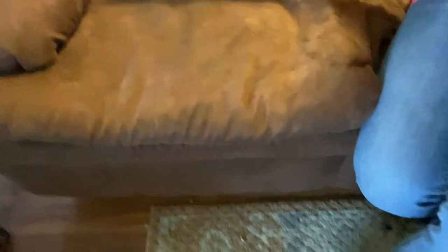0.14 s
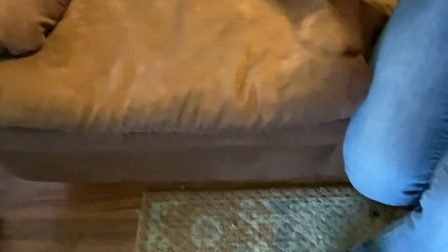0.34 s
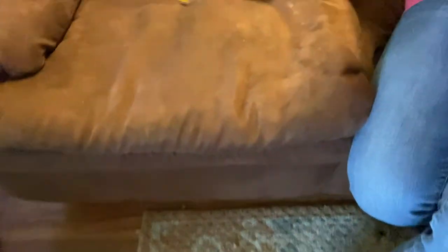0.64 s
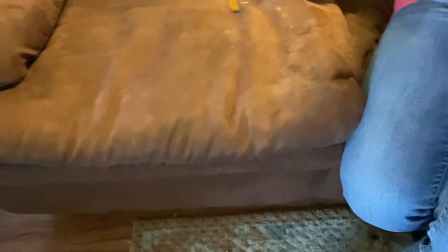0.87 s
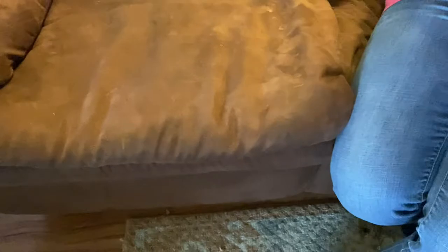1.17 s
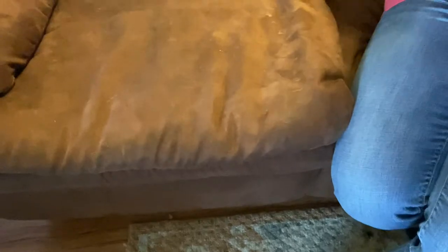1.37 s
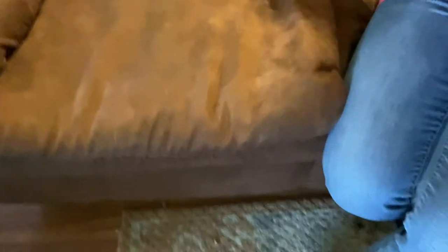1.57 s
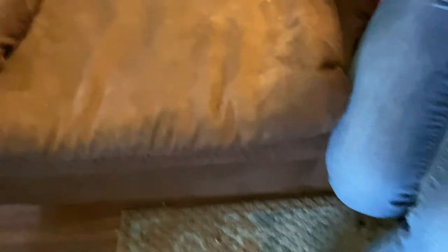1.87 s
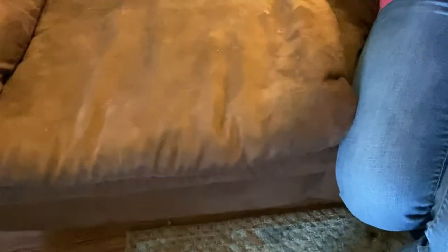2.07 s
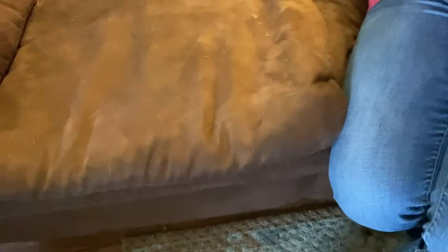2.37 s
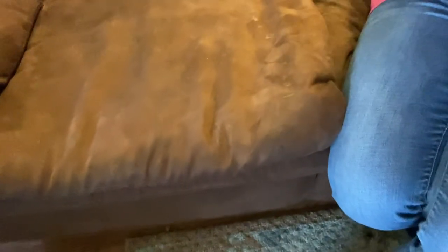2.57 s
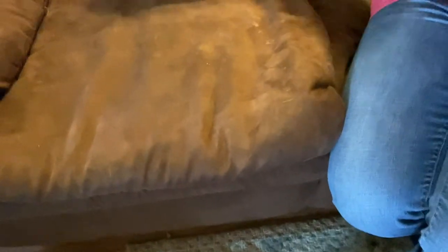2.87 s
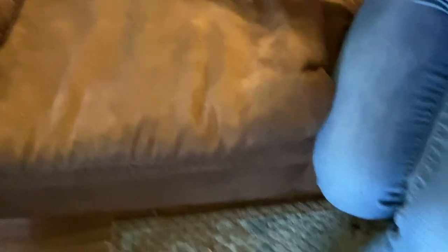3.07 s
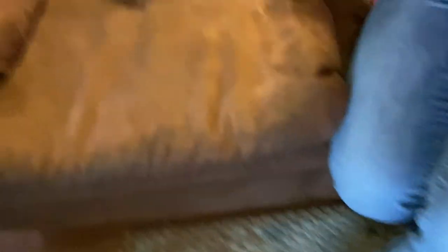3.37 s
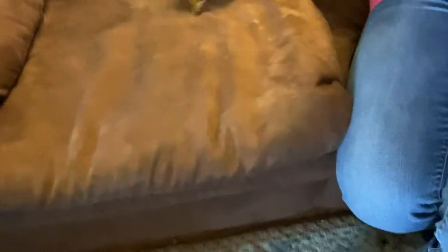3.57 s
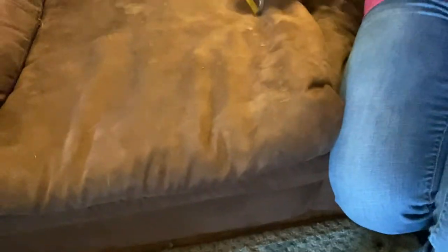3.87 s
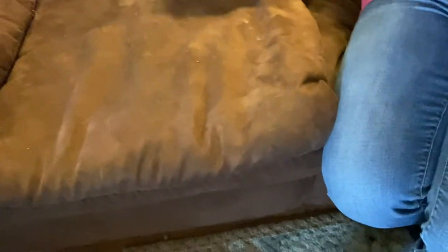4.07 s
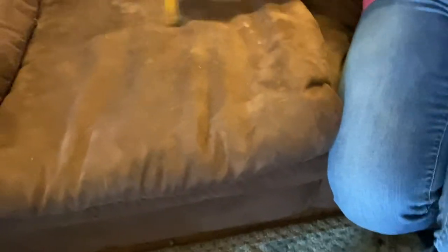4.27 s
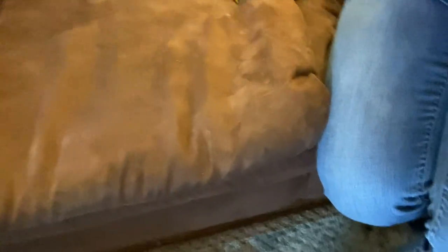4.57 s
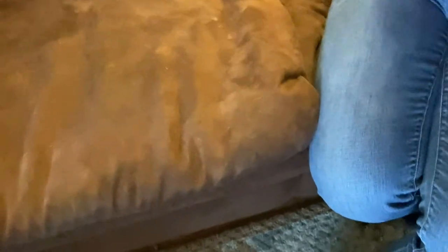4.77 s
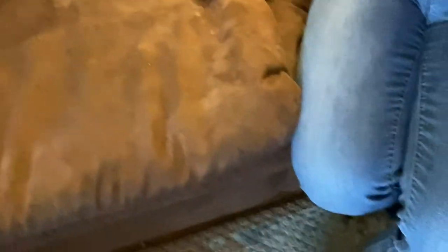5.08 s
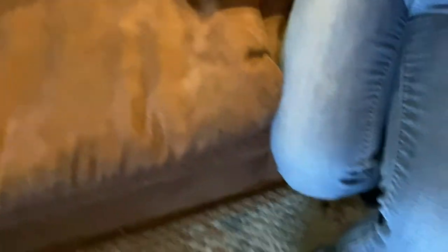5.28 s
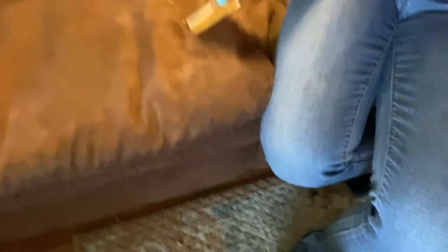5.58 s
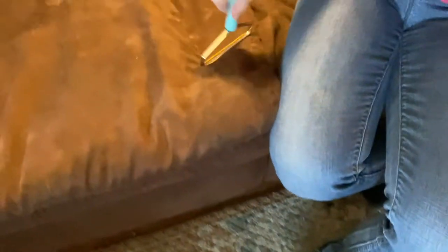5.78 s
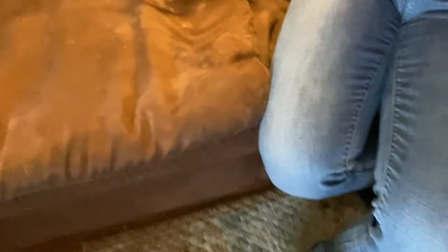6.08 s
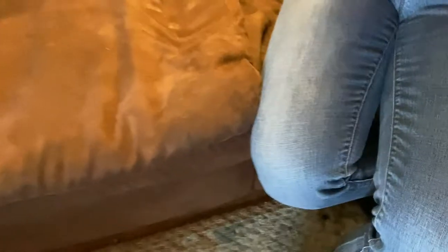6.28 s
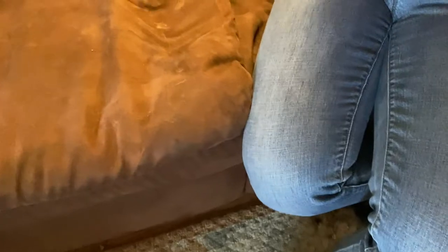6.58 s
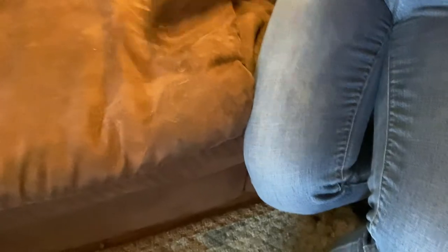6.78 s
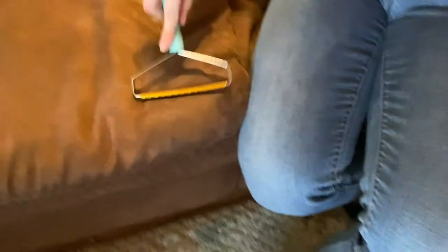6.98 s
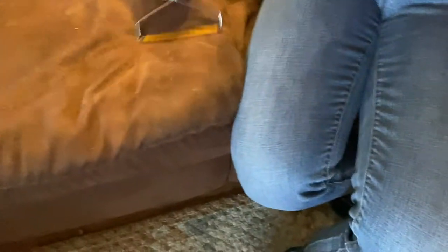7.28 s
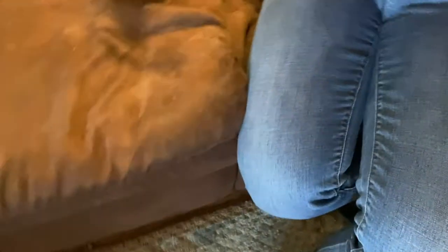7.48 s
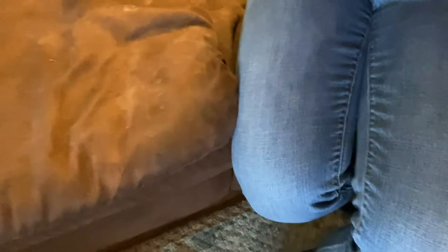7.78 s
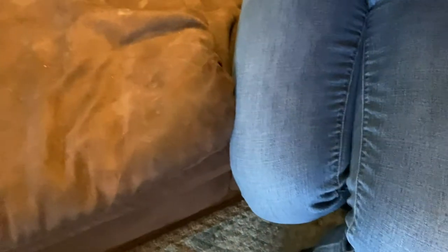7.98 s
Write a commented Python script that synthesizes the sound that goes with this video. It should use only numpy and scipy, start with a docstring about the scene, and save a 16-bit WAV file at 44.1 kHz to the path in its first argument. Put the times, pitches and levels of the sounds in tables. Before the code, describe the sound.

A close stereo pickup in a quiet, softly furnished room, with a faint low rumble throughout. A wire-framed metal bar lands on a padded cushion with a small knock at 0.3 s and is dragged until about 1.1 s, a coarse mid-pitched rasp with fine hiss and a faint wavering, zippery singing from the weave. After a pause, a second scrape runs from 1.65 to 2.45 s, with a dull padded thud near 1.8 s. A third, somewhat softer, goes from 3.1 to 3.9 s, bumping a fold near 3.4 s. A brief crisp click starts a short stroke at 4.2 to 4.6 s. The fifth, duller and steadier, lasts from 5.0 to 5.75 s. Only faint touches follow until a sharp clack at 7.0 s opens the last, fastest scrape, swelling into a loud ripping rasp and hard knocks around 7.25 to 7.3 s, then near silence to 8 s.

```python
"""Metal bar dragged over a cushion

A ridged metal bar on a wire frame is set down on a padded fabric cushion and dragged across it in six strokes.
Stick-slip of the fibres is random impulses, band-filtered into rasp and hiss and ringing the bar's resonances;
the weave sings faintly as narrow-band noise, and knocks over folds are decaying bursts and falling sine thuds.
Two close microphone ports hear this with phase gaps and short echoes, over the noise of a quiet furnished room."""
import sys
import numpy as np
from scipy import signal
from scipy.fft import rfft, irfft, next_fast_len
from scipy.io import wavfile
from scipy.ndimage import uniform_filter1d

SR = 44100
rng = np.random.default_rng(int(sys.argv[2]) if len(sys.argv) > 2 else 0)


def file_out(sig):
    """Save sig as 16-bit WAV at sys.argv[1]."""
    # one column per channel
    cols = np.atleast_2d(sig).T
    # limit, then scale
    lim = np.clip(cols, -1, 1)
    pcm = np.round(lim * 32767).astype(np.int16)
    wavfile.write(sys.argv[1], SR, pcm)


N = 358974
SIZE = next_fast_len(N + SR // 2)   # FFT length, with room for filter tails
HZ = np.arange(SIZE // 2 + 1) * SR / SIZE
SILENT_DB = -130


def strokes():
    """Stick-slip friction: impulse trains filtered into five bands, each following its own level curve."""
    # one table per drag: start_s, rasp_db, hiss_db, rumble_db, bite_over_rasp_db, drone_over_rasp_db
    # (start_s is the time of each curve point)
    drags = [
        [(0.345, -65, -65, -53, 1, 9), (0.391, -44.5, -58, -44, -7, -13), (0.419, -49, -53, -51, -1.5, -5),
         (0.633, -40.5, -49, -47.5, -6, -4), (0.783, -45.5, -50, -50, -1, -1),
         (0.813, -49.5, -52.5, -45.5, -4.5, 4), (0.879, -46, -56, -51, -5, -1.5),
         (0.951, -48, -55.5, -45, -4.5, -3), (1.033, -51.5, -58, -52, -5, -2.5),
         (1.081, -57.5, -64.5, -53.5, -8, -2), (1.181, -84.5, -101, -74, -6, 6),
         (1.22, -98, -103, -78, -3, 21.5)],
        [(1.655, -77, -82, -69, -8, 9), (1.667, -66, -69.5, -60.5, -3.5, 1.5),
         (1.789, -48, -56, -53.5, -8, -3.5), (1.967, -42, -53, -50, -6, -2), (1.993, -45.5, -51, -35.5, -3, -2),
         (2.083, -48, -60, -57.5, -5.5, -1), (2.145, -47, -55, -44, -4, -4.5),
         (2.201, -50, -57, -54.5, -3.5, -5), (2.297, -53.5, -62, -48.5, -7.5, 4),
         (2.357, -57, -61, -49, -3.5, 4.5), (2.417, -55, -52, -53, -2.5, -9), (2.46, -73, -73, -57, -6, 5)],
        [(3.125, -73, -81, -57, -7, 6), (3.163, -56.5, -62.5, -54.5, -5, -2.5),
         (3.261, -49.5, -55, -62, -5, 2.5), (3.285, -48.5, -52.5, -51.5, -5, -0.5),
         (3.409, -49, -55, -57, -3, 0), (3.481, -44, -47, -51, -3.5, -1.5), (3.507, -50, -46, -53, -1.5, 0.5),
         (3.583, -52.5, -58.5, -53, -4, 3.5), (3.629, -49.5, -54, -47, -4, -2),
         (3.821, -55, -60.5, -54.5, -7, -1.5), (3.919, -72.5, -74.5, -65, -5, 3),
         (3.98, -85, -101, -68, -17, 4)],
        [(4.255, -72, -75, -47, -2, 8), (4.273, -58.5, -56, -51.5, 1.5, 6), (4.303, -54.5, -49, -58, 1, -1),
         (4.349, -50.5, -55, -59, -2, 1.5), (4.379, -47.5, -53.5, -51, -3.5, 2),
         (4.443, -51.5, -54.5, -50, -3, -4), (4.469, -50, -56.5, -44, -6, -11),
         (4.497, -55.5, -55.5, -54, -0.5, 3), (4.537, -59.5, -66.5, -44.5, -7, 0),
         (4.583, -68, -71.5, -60, -4.5, -1), (4.649, -80, -97, -63, -15, 9), (4.68, -92, -96, -78, -14, 15)],
        [(4.97, -79, -83, -66, -10, 5), (5.016, -61, -62, -55, -4, -4), (5.052, -49.5, -59.5, -50, -9, -4.5),
         (5.172, -49.5, -62, -42.5, -6, 1), (5.226, -50, -61.5, -52, -5.5, -3),
         (5.406, -50.5, -59.5, -50.5, -1.5, -1.5), (5.432, -47.5, -60, -48, -1, -10),
         (5.458, -52, -59.5, -53, -6, -2), (5.578, -46.5, -60.5, -56, -7, -12),
         (5.656, -49, -62, -57, -7, -4.5), (5.736, -53.5, -64, -54, -6.5, -12.5), (5.77, -72, -78, -61, -1, 1)],
        [(7.04, -61, -71, -56, 0, -1.5), (7.058, -57.5, -63, -67, -2, -1.5),
         (7.094, -44.5, -56, -48, -2.5, -5.5), (7.132, -42, -48.5, -52, 1.5, -4.5),
         (7.202, -40.5, -52, -51, -1.5, 0.5), (7.248, -30.5, -46.5, -36, -6.5, -2),
         (7.268, -35.5, -47.5, -46, -7.5, -3), (7.298, -30.5, -47, -40, -7, -2.5),
         (7.318, -40, -50.5, -41, -3, -5), (7.36, -56.5, -63.5, -49.5, -5.5, 0.5),
         (7.392, -60.5, -58.5, -56, 0.5, -1.5), (7.52, -84, -101, -72, -18, 7.5)],
    ]
    # relative spectra of the bands: frequency_hz, level_db
    drone_colour = [(200, -24), (380, 11), (600, 13.5), (800, -11.5), (1300, -87.5)]
    rasp_colour = [(500, -29.5), (800, 17), (1100, 18), (1500, 7.5), (2400, -38)]
    bite_colour = [(1000, -32.5), (1500, -1.5), (2000, -2.5), (2700, -6.5), (3500, -13), (5000, -15),
                   (7000, -56.5)]
    hiss_colour = [(2000, -8), (3500, -13.5), (5500, 2), (8000, 5), (9300, -3.5), (11500, -1), (13500, 0.5),
                   (14800, -7.5), (15700, -7)]
    rumble_colour = [(40, -8), (80, 4.5), (130, 2), (250, 5.5), (400, -0.5), (700, -41)]

    rasp_db, hiss_db, rumble_db, bite_db, drone_db = in_time(drags, silent=3 * [SILENT_DB] + [0, 0])
    drag_db = [rasp_db, hiss_db, rumble_db, rasp_db + bite_db, rasp_db + drone_db]
    levels_db = uniform_filter1d(np.maximum(drag_db, touches()), size=60)
    rasp_db, hiss_db, rumble_db, bite_db, drone_db = levels_db

    coarse = rms_one(snags(per_s=3000.0, spread_db=0.0, clump_db=0.5))
    coarse = coarse + from_db(-3.0) * bar(coarse)
    # the nap is uneven, so each coarse band comes and goes on its own
    coarse_bands = []
    for colour in (drone_colour, rasp_colour, bite_colour):
        band = rms_one(filtered(coarse, from_db(at_hz(colour))))
        coarse_bands.append(band * from_db(0.95 * drift(14)))
    drone, rasp, bite = coarse_bands

    fine = snags(per_s=11000.0, spread_db=0.0, clump_db=1.0)
    fine = fine + from_db(1) * bar(fine)
    hiss = rms_one(filtered(fine, from_db(at_hz(hiss_colour))))

    padding = snags(per_s=900.0, spread_db=2.5, clump_db=0.5)
    rumble = rms_one(filtered(padding, from_db(at_hz(rumble_colour))))

    cloth = from_db(rasp_db) * rasp + from_db(drone_db) * drone + from_db(bite_db) * bite
    return cloth + from_db(hiss_db) * hiss + from_db(rumble_db) * rumble


def touches():
    """Brief friction as the bar lands, shifts or lifts: quick attack, swelling or sinking hold, exponential fade."""
    # start_s, length_s, rasp_db, hiss_db, rumble_db, bite_over_rasp_db, drone_over_rasp_db, swell_db
    # (levels at mid-hold; swell from start to end of the hold)
    brushes = [(0.04, 0.17, -82, -92, -70, -5, -3, -1), (0.221, 0.094, -60, -66, -54, -5.5, 1.5, 9),
               (1.573, 0.062, -71, -74, -59, -11.5, 1, -13),
               (2.464, 0.082, -67.5, -69.5, -61.5, -6.5, 2, 4),
               (3.026, 0.053, -68.5, -80.5, -57.5, -1.5, 6.5, 12),
               (4.034, 0.07, -80.5, -96, -72, -3.5, 1, -3), (4.192, 0.032, -64.5, -66, -51.5, 1.5, 1, -11),
               (4.746, 0.044, -85, -84, -85, -7, -4, 0), (4.823, 0.074, -54, -71, -56.5, -9.5, -8.5, 12.5),
               (5.764, 0.1, -65, -72, -70, -6, -1.5, 11), (6.052, 0.065, -81.5, -98.5, -65, -7.5, 3, 5),
               (6.645, 0.19, -88, -90.5, -82, -12, -3, 3), (6.87, .05, -85, -78, -68, -15, 5, 1),
               (6.986, 0.051, -65, -70, -52, -1, -6, -11), (8.046, 0.052, -79, -93, -74.5, -5, 0, 2)]
    attack_s, fade_db_per_s = 0.01, 493
    loudest_db = np.full((5, N), SILENT_DB, float)
    t = np.arange(N) / SR
    for start_s, length_s, rasp_db, hiss_db, rumble_db, bite_db, drone_db, swell_db in brushes:
        held = np.clip((t - start_s) / length_s, 0, 1)
        rise_db = 20 * np.log10(np.clip((t - start_s) / attack_s, 1e-6, 1))
        fade_db = fade_db_per_s * np.maximum(t - start_s - length_s, 0)
        shape_db = rise_db + swell_db * (held - .5) - fade_db
        levels_db = np.array([rasp_db, hiss_db, rumble_db, rasp_db + bite_db, rasp_db + drone_db])
        loudest_db = np.maximum(loudest_db, levels_db[:, None] + shape_db)
    return loudest_db


def snags(per_s, spread_db, clump_db):
    """Shot noise: fibres slip at random instants and signs, with drifting strength, at the bar's middle and ends."""
    shape = (3, N)   # rows: middle, left end, right end
    strength = from_db(spread_db * np.minimum(rng.exponential(1, shape), 5))
    signed = strength * np.sign(rng.random(shape) - .5)
    slips = rng.random(shape) < per_s / SR
    return signed * slips * from_db(clump_db * drift(53))


def bar(x):
    """Modal resonance: the bar and its wire frame ring in parallel modes of alternating sign."""
    # frequency_hz, width_hz, gain_db
    modes = [(717, 40, 7), (1102, 86, -8.5), (1940, 220, -13.5), (2920, 62, -7), (5350, 30, 2.5),
             (8500, 76, -11), (8990, 360, 1)]
    ringing = 0
    for k, (hz, width_hz, gain_db) in enumerate(modes):
        ringing = ringing + from_db(gain_db) * resonance(x, hz, width_hz) * (-1) ** k
    return ringing


def weave_note(width_hz):
    """Periodic excitation: threads pass the edge at a rate set by the speed, heard as a narrow wavering band."""
    # one table per singing passage: start_s, pitch_hz, level_db (start_s is the time of each curve point)
    passages = [
        [(0.39, 1200, -60), (0.435, 1600, -52), (0.47, 1750, -54), (0.49, 2000, -53), (0.53, 2150, -56),
         (0.55, 2150, -72)],
        [(0.72, 2000, -66), (0.75, 2030, -51), (0.778, 2125, -45), (0.798, 2080, -49), (0.814, 1490, -49),
         (0.824, 1550, -60), (0.838, 1710, -48), (0.874, 1660, -50), (0.896, 2060, -44), (0.915, 1950, -48),
         (0.935, 1810, -62), (1.024, 1730, -52), (1.05, 1470, -70)],
    ]
    note_hz, note_db = uniform_filter1d(in_time(passages, silent=[1800, SILENT_DB]), size=400)
    low_pass = signal.butter(2, width_hz / 2, fs=SR, output="sos")
    in_phase, quadrature = signal.sosfilt(low_pass, rng.standard_normal((2, N)))
    phase = 2 * np.pi * np.cumsum(note_hz) / SR
    return from_db(note_db) * rms_one(in_phase * np.cos(phase) + quadrature * np.sin(phase))


def knocks():
    """Impact as the bar lands or jumps a fold: crack ringing the bar, thin snap, padding thud falling in pitch."""
    # start_s, crack_db, snap_db, thud_db, pitch_hz (thud before doubling; pitch where its fall settles)
    impacts = [(0.224, -58, -69, -45.5, 75), (0.305, -31.5, -47, -29.5, 104.4), (0.393, -39, -40, -44, 226),
               (0.567, -33, -59, -53.5, 411), (1.566, -58, -55, -58, 300), (1.668, -65, -57, -46, 80.6),
               (1.83, -43, -55, -21, 376), (1.993, -30, -55, -48, 252), (2.129, -44, -55, -36, 282),
               (2.243, -55, -59, -38, 139), (3.065, -52, -76, -59, 227), (3.369, -30, -57, -25, 362),
               (3.619, -48, -53, -49, 350), (4.191, -31, -34, -40, 123), (4.239, -67, -64, -43, 252),
               (4.275, -49, -54, -35, 308), (4.539, -58, -65, -44.5, 98), (4.833, -58, -72, -59, 234),
               (5.146, -54, -61, -48, 266), (5.174, -45, -59, -38.5, 104), (5.425, -31.5, -56, -55, 300),
               (5.87, -56, -43.5, -64, 75), (6.249, -73, -85, -48.5, 70), (6.954, -69, -62, -51, 71),
               (6.989, -27.5, -32.5, -37, 153), (7.242, -31.5, -45, -34, 203),
               (7.293, -18.5, -49, -21.5, 223), (7.319, -26, -56, -32.5, 116)]
    t = np.arange(SR // 8) / SR
    cracks, snaps, thuds = np.zeros((3, N + SR))
    bursts = np.sign(rng.standard_normal((len(impacts), len(t)))) * np.exp(-t / .0015)
    for burst, (start_s, crack_db, snap_db, thud_db, pitch_hz) in zip(bursts, impacts):
        first = round(start_s * SR)
        at = slice(first, first + len(t))
        cracks[at] += from_db(crack_db) * (.4 * np.exp(-t / 0.00046) + .6 * burst)
        snaps[at] += from_db(snap_db) * burst
        phase = 2 * np.pi * pitch_hz * np.cumsum(1 + 2.2 * np.exp(-t / 0.0035)) / SR
        thud_shape = (1 - np.exp(-t / 0.015)) * np.exp(-t * pitch_hz / 1.7)
        thuds[at] += from_db(thud_db) * np.sin(phase) * thud_shape
    cracks = band_at_same_peak(cracks, order=2, band_hz=[350, 2200])
    snaps = band_at_same_peak(snaps, order=1, band_hz=[2200, 11000])
    return (cracks + from_db(-28.0) * bar(cracks) + snaps + 2 * thuds)[:N]


def band_at_same_peak(x, order, band_hz):
    """Band-pass filtering, rescaled so that the highest positive peak of the whole track is kept."""
    band = signal.butter(order, band_hz, "band", fs=SR, output="sos")
    y = signal.sosfilt(band, x + 1e-18)   # tiny offset avoids denormal numbers
    return x.max() / y.max() * y


def ports(x, ends):
    """Two-receiver interference: a phase gap varying with pitch, and a level lean at lower pitches only."""
    # ends of the wide bar, each heard by one port: frequency_hz, gain_db
    end_gain = [(60, -9), (150, -28), (400, -6.5), (1000, -7), (3000, -3.5), (5500, -3), (8000, -32.5),
                (15000, -21)]
    # where the drags sit between the ports: start_s, left_minus_right_db
    lean = [(0.7, -2.5), (2.0, -2), (3.5, -2), (4.4, -2.5), (4.9, -6), (5.1, -2), (5.7, -4.5), (7.2, -3.5)]
    lean_top_hz = 5000   # the lean fades out above this
    s, lean_db = np.transpose(lean)
    lean_db = np.interp(np.arange(N) / SR, s, lean_db)
    pair = filtered(x, port_gap()) + filtered(ends, from_db(at_hz(end_gain)))
    low = filtered(pair, 1 / (1 + (HZ / lean_top_hz) ** 4))
    lean_gain = from_db(lean_db / 2 * np.array([[1], [-1]]))
    return pair + low * (lean_gain - 1)


def port_gap():
    """Phase difference: half the gap forward on the left, half back on the right."""
    # frequency_hz, left_lead_rad; the ports agree near 8 and 13 kHz and oppose at 10.4 kHz
    phase_gap = [(0, 0), (3900, 0.2), (5250, 3.4), (6700, 5.5), (7900, 6.28), (10400, 9.42), (13100, 12.57),
                 (15300, 15.7)]
    return np.exp(.5j * np.interp(HZ, *np.transpose(phase_gap)) * [[1], [-1]])


def room(x):
    """Diffuse reverberation: dense echoes off soft furniture as decaying noise, independent in each port."""
    # echoes relative to the direct sound: frequency_hz, gain_db
    echo_gain = [(60, -12), (400, -9), (2000, -6), (6000, -4.5), (15000, -54.5)]
    t60_s = 0.24
    t = np.arange(SR // 3) / SR
    tail = rng.standard_normal((2, len(t))) * from_db(-60 * t / t60_s) * (t > .002)
    tail = tail / np.sqrt(np.sum(tail ** 2, axis=1, keepdims=True))   # unit energy
    return filtered(x, rfft(tail, SIZE) * from_db(at_hz(echo_gain)))


def hum():
    """Partly coherent noise: low household rumble over microphone hiss, stronger on the right."""
    # relative room-tone spectrum: frequency_hz, level_db
    tone = [(15, -40.5), (27, -31.5), (45, -8.5), (64, -1.5), (120, -10), (160, -14.5), (240, -11.5),
            (420, -13), (520, -16.5), (800, -19), (1250, -28.5), (1450, -41), (3000, -45), (8000, -51),
            (15500, -54)]
    # left-right correlation, limited to -1..1 below: frequency_hz, correlation
    likeness = [(60, 0.82), (130, 0.79), (290, 0.39), (640, -2), (1400, -0.18), (3000, -0.17),
                (6000, 0.026), (8000, 1), (15000, 1)]
    # frequency_hz, left_minus_right_db
    balance = [(60, -4.5), (200, -8), (380, -7), (700, -6), (1300, -4), (2400, -.5), (15000, -.5)]
    level_db = -59
    mid, side = rfft(rng.standard_normal((2, SIZE)))
    alike = np.clip(at_hz(likeness), -1, 1)
    pair = np.sqrt(1 + alike) * mid + np.sqrt(1 - alike) * side * [[1], [-1]]
    colour = from_db(at_hz(tone) + at_hz(balance) / 2 * [[1], [-1]])
    pair = irfft(pair * port_gap() * colour, SIZE)[:, :N]
    return from_db(level_db) * pair / pair.std()


def from_db(db):
    """Logarithmic level: decibels to amplitude gain."""
    return 10 ** (np.asarray(db) / 20)


def rms_one(x):
    """Power normalisation: scale to unit rms along time."""
    return x / np.sqrt(np.mean(x ** 2, axis=-1, keepdims=True) + 1e-20)


def at_hz(points):
    """Logarithmic pitch scale: read a table at every frequency, straight on a log axis."""
    hz, value = np.transpose(points)
    return np.interp(np.log(HZ + 1), np.log(hz), value)


def in_time(tables, silent):
    """Piecewise-linear envelopes: table columns over time, at their silent values between the tables."""
    out = np.tile(np.array(silent, float)[:, None], N)
    t = np.arange(N) / SR
    for rows in tables:
        s, *columns = np.transpose(rows)
        inside = slice(int(s[0] * SR), int(s[-1] * SR) + SR // 40)   # the last value is held for 25 ms
        out[:, inside] = [np.interp(t[inside], s, c) for c in columns]
    return out


def filtered(x, response):
    """Convolution theorem: multiply the spectrum by a response."""
    return irfft(rfft(x, SIZE) * response, SIZE)[..., :N]


def drift(rate_hz):
    """Slow random fluctuation: noise through two equal one-pole low-passes, at unit rms."""
    r = np.exp(-2 * np.pi * rate_hz / SR)
    noise = rng.standard_normal(N + SR)
    return rms_one(signal.lfilter([1], [1, -2 * r, r * r], noise)[SR:])   # first second settles the filter


def resonance(x, hz, width_hz):
    """Damped oscillator: a two-pole resonance of gain near 1 at its peak."""
    r = np.exp(-np.pi * width_hz / SR)
    poles = [1, -2 * r * np.cos(2 * np.pi * hz / SR), r * r]
    return signal.lfilter([(1 - r * r) / 2, 0, (r * r - 1) / 2], poles, x)


def scene():
    """Superposition: bar on cushion through ports and room, over the hum."""
    middle, *ends = strokes()
    tool = middle + weave_note(width_hz=100) + knocks()
    return ports(tool, ends) + room(tool) + hum()


def record(dry):
    """Band limiting: a steep low-pass removes the top, 70 dB down from 15.9 kHz."""
    return signal.sosfilt(signal.cheby2(20, 70, 15900, fs=SR, output="sos"), dry)


dry = scene()
out = record(dry)
file_out(out)
```